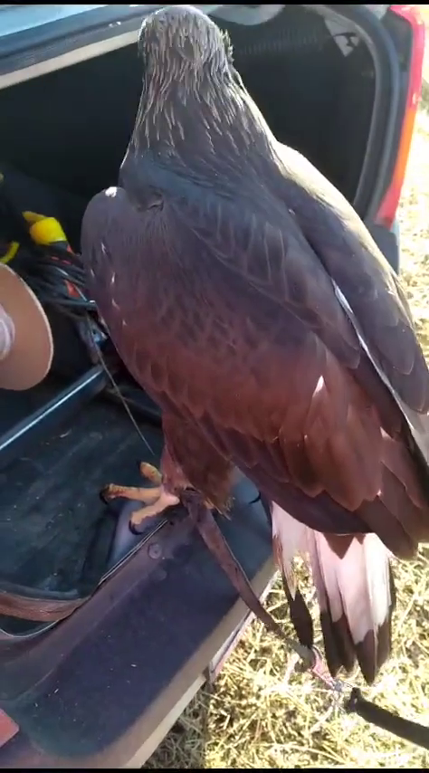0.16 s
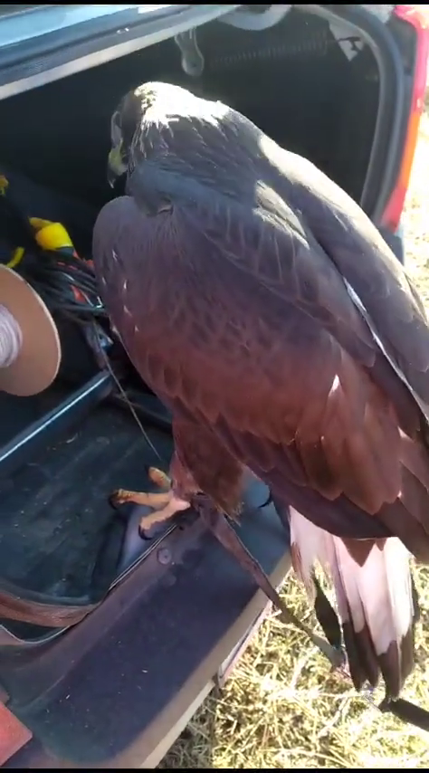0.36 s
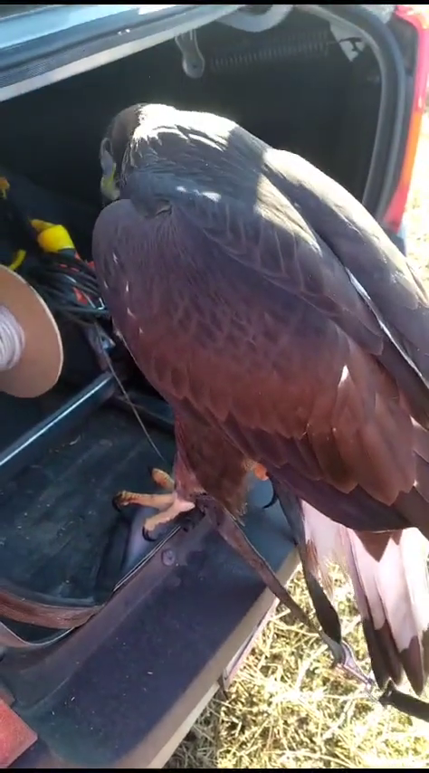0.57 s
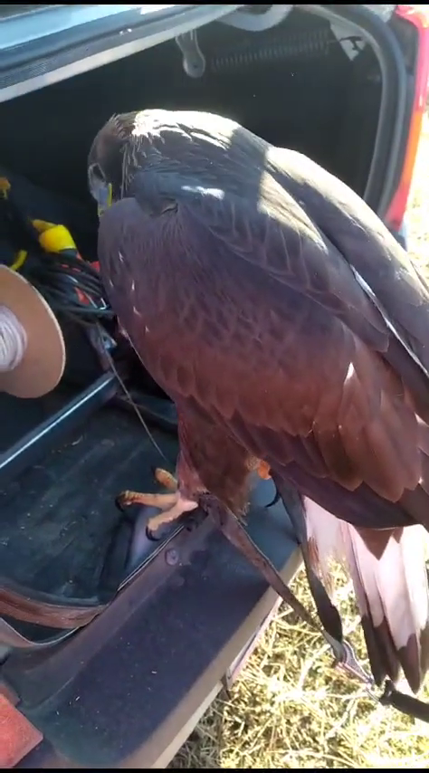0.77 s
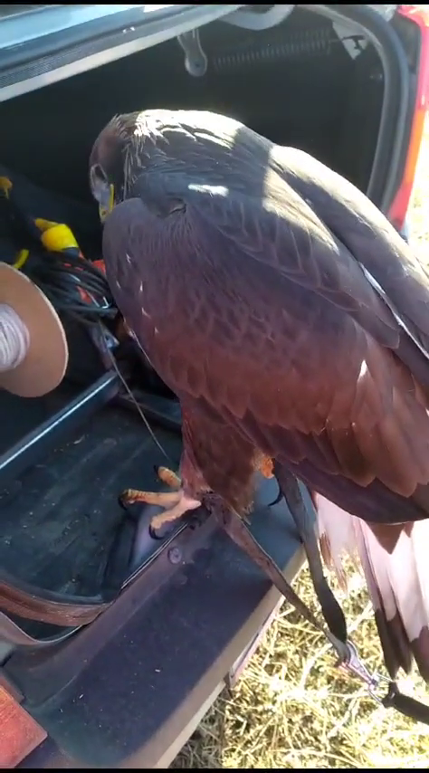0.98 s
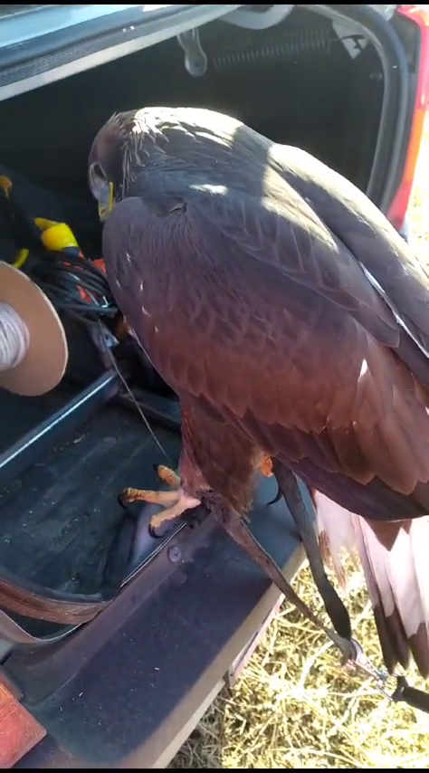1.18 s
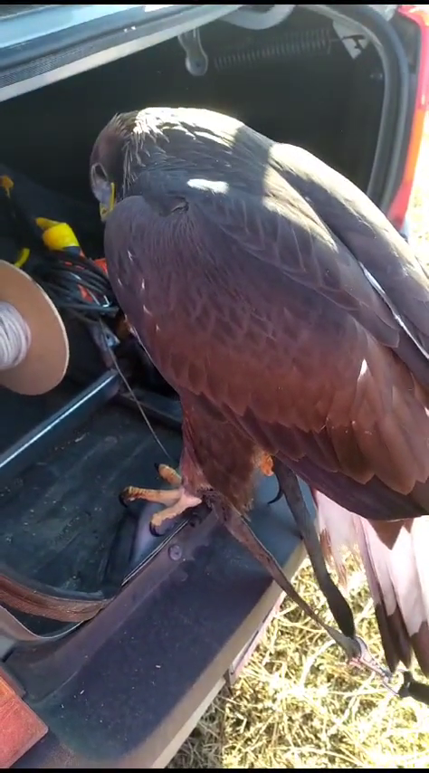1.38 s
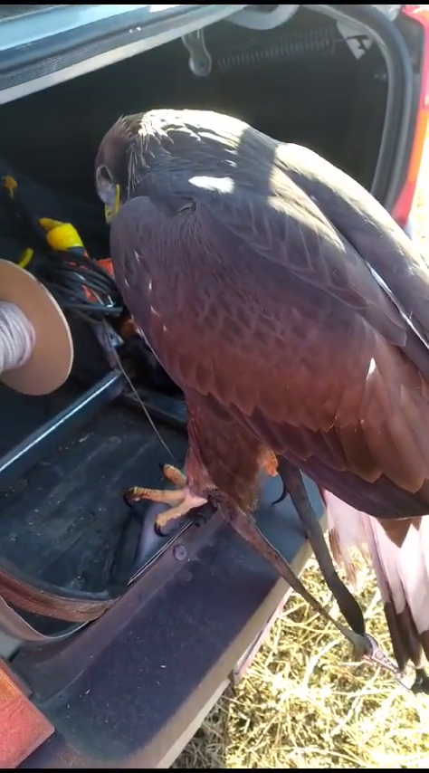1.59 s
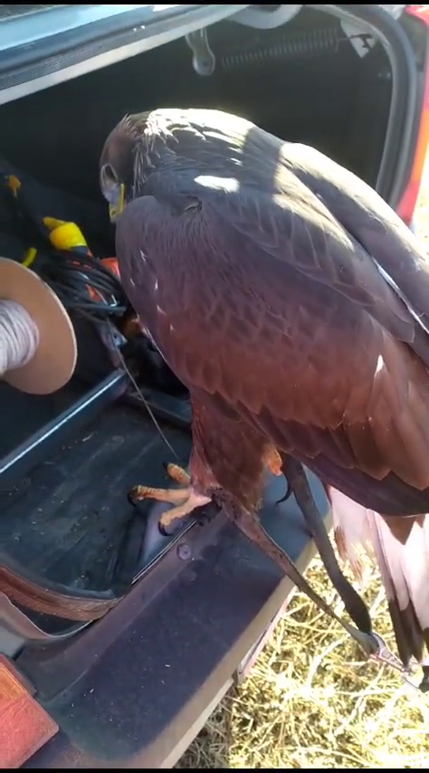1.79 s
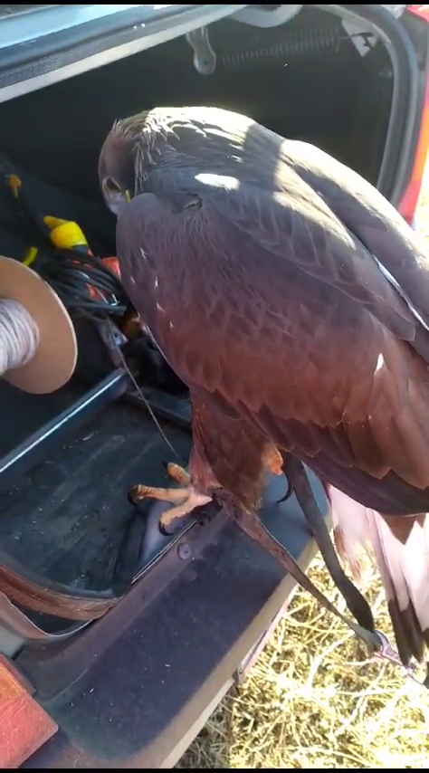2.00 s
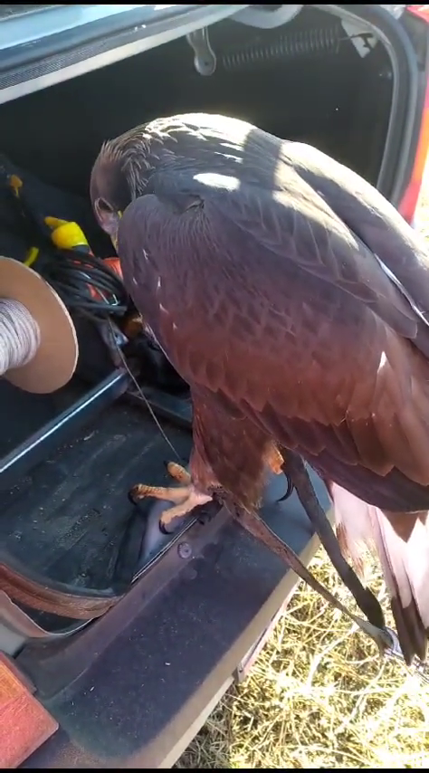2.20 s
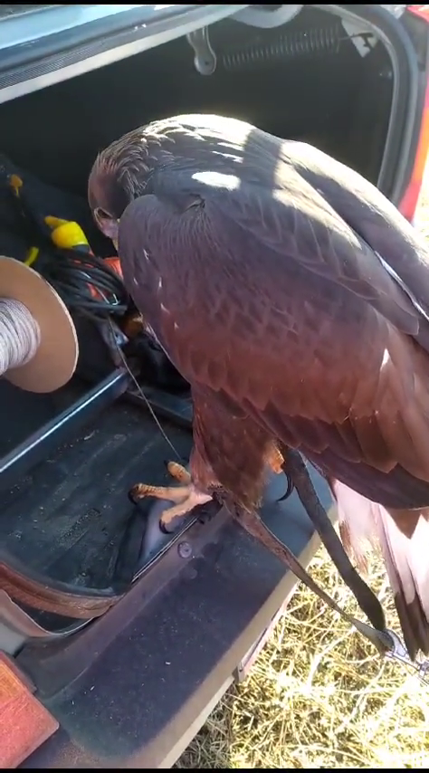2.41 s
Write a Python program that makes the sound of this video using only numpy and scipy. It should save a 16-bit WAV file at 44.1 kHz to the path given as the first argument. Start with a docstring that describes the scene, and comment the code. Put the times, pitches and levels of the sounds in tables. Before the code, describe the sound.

One eagle yelp, close in an open car boot outdoors. Feathers rustle softly from 0 to 0.3 s over faint low air noise and a barely audible drone. At 1.1 s a thin, wavering high whistle begins, swells by 1.4 s, cracks and tumbles hoarsely down until 1.62 s. Around 2 s comes a faint feather brush; low wind buffets mainly the left through 2.4 s as a distant rush grows.

```python
"""In an open car boot, a perched golden eagle gives one thin yelp, close by.
Two voices in its syrinx (the bird's voice box) whistle against each other as gliding sine waves.
Then the voice cracks and tumbles down in hoarse steps, made of unsteady overtones and pulsed hiss.
Feathers rustle as grainy hiss over faint outdoor noise and a wavering drone. At the end a distant
rush grows, and a gust, made of low noise, buffets mostly the left microphone port."""
import sys
import numpy as np
from scipy import signal
from scipy.fft import rfft, irfft
from scipy.io import wavfile
from scipy.ndimage import uniform_filter1d

SR = 44100
rng = np.random.default_rng(int(sys.argv[2]) if len(sys.argv) > 2 else 0)


def put_to_file(sound):
    """Save the sound as 16-bit audio at rate SR, in the file named by the first command-line argument."""
    columns = np.atleast_2d(sound).T  # one column per channel
    safe = np.clip(columns, -1, 1)
    whole_steps = np.round(safe * 32767)
    wavfile.write(sys.argv[1], SR, whole_steps.astype(np.int16))


N = 107868
TIME, FREQS = np.arange(N) / SR, np.fft.rfftfreq(N, 1 / SR)

# Outdoor background: its tone colour (frequency [Hz], relative level [dB per Hz])
AIR_COLOUR = [(15, -45), (25, -17), (36, 0), (55, 0.5), (85, 1), (125, -10), (250, -10), (450, -11.5),
              (700, -10), (1050, -8), (1500, -17.5), (2000, -27), (2800, -36.5), (5000, -38.5), (9000, -36),
              (15000, -44.5)]
# How alike the background is at left and right (frequency [Hz], likeness [0 to 1])
AIR_LIKENESS = [(50, 1), (300, 0.86), (700, 0.31), (1200, 0.073), (6000, 0.065)]
# Tilt of the background at the left port (frequency [Hz], gain [dB])
AIR_LEFT_TILT = [(100, 0.5), (2000, 0), (9000, -0.5)]
AIR_DB, AIR_PATCH_DB = -51.5, 2
# Distant wavering drone (frequency [Hz], level [dB])
DRONE = [(172, -63), (343, -68), (1672, -74.5)]
DRONE_WIDTH_HZ = 14

# Distant rush (time [s], level [dB]) and its tone colour (frequency [Hz], relative level [dB per Hz])
RUSH_LEVEL = [(1.9, -105), (2.1, -62), (2.25, -56), (2.44, -53)]
RUSH_COLOUR = [(400, -20), (900, 0), (1400, -1.5), (1800, -14), (2600, -39), (5000, -82)]

# Wind pressure (time [s], left level [dB], left minus right [dB])
GUST = [(0, -42.5, -4), (.03, -55.5, -4.5), (.1, -80, -22), (1.8, -67, 35), (1.91, -45, 0),
        (1.965, -39.5, 29), (2.0, -28, 23), (2.03, -30.5, 27), (2.055, -40.5, 11), (2.09, -28.5, 32),
        (2.15, -46, 9), (2.19, -34.5, 6), (2.215, -43.5, 3), (2.26, -20, 30.5), (2.285, -41.5, 35),
        (2.308, -26, 36), (2.36, -21.5, 31), (2.395, -33, 17), (2.445, -39.5, 13)]
# Sharp puffs within the gust (time [s], peak level at the left [dB])
PUFFS = [(1.987, -36), (2.026, -30.5), (2.076, -35.5), (2.256, -32), (2.349, -28.5)]
PUFF_WIDTH_S = 0.0075
# Low pressure swings and smaller eddies of the wind (frequency [Hz], relative level [dB per Hz])
BUFFET_COLOUR = [(20, -8), (45, -0.5), (75, 4.5), (125, 5), (180, -8), (300, -29), (600, -24), (2000, -90)]
EDDY_COLOUR = [(60, -11), (150, 2), (250, 5), (380, -8), (550, -21), (1200, -33), (3000, -78)]
# Eddies have EDDY_DB when the gust is at FULL_GUST_DB; growth is in dB per dB of gust
EDDY_DB, EDDY_GROWTH, FULL_GUST_DB = -32.5, 1.0, -21.5

# Feather rustle, then a softer stroke (time [s], level [dB])
RUSTLE_LEVEL = [(0, -48.5), (.007, -46.5), (.045, -45.5), (.064, -48), (.085, -55), (.127, -55.5),
                (.148, -64.5), (.2, -66), (.29, -65.5), (.305, -60), (.32, -68.5), (.385, -68), (.55, -100)]
BRUSH_LEVEL = [(1.85, -100), (1.96, -75), (2.055, -58), (2.11, -69), (2.17, -70.5), (2.26, -95)]
# Tone colours of the rustle and the softer stroke (frequency [Hz], relative level [dB per Hz])
RUSTLE_COLOUR = [(30, -11), (400, 4), (750, 3.5), (1100, -22), (2000, -9), (4500, -7.5), (6500, -8),
                 (9000, -0.5), (12000, -7.5), (15500, -9)]
BRUSH_COLOUR = [(2500, -15.5), (4500, -15), (6800, -3.5), (9500, -6.5), (12500, -15), (15000, -43)]
FEATHER_GRAIN_DB, FEATHER_LEFT_DB = 2.5, -6

# The two voices of the syrinx, before the beak (time [s], pitch [Hz], level [dB])
LOW_VOICE = [(1.098, 2620, -58), (1.113, 2625, -52.5), (1.128, 2680, -46), (1.153, 2835, -53.5),
             (1.172, 2930, -53), (1.19, 2980, -60.5), (1.21, 3000, -48), (1.25, 2970, -58),
             (1.28, 2890, -57), (1.297, 2825, -49), (1.34, 2755, -50), (1.366, 2815, -46.5),
             (1.386, 2925, -54), (1.399, 3020, -54), (1.411, 3215, -38.5), (1.425, 3225, -39.5),
             (1.436, 3120, -41), (1.442, 3080, -41), (1.455, 3170, -45)]
HIGH_VOICE = [(1.195, 3460, -75), (1.214, 3430, -59), (1.228, 3415, -53), (1.262, 3390, -53.5),
              (1.286, 3370, -63), (1.305, 3370, -82), (1.37, 3460, -84), (1.38, 3440, -57),
              (1.393, 3395, -50), (1.405, 3480, -43.5), (1.414, 3580, -48), (1.422, 3570, -47),
              (1.43, 3480, -38), (1.436, 3410, -47), (1.442, 3340, -66)]
# Overtones of one voice, weakened by the other (low multiple, high multiple, level [dB])
OVERTONES = [(2, 0, -21.5), (0, 2, -13), (3, 0, -19.5), (4, 0, -19)]
# Sum and difference tones where both voices sound (low multiple, high multiple, level [dB])
COMBINATIONS = [(1, 1, -6.5), (2, 1, -13), (1, 2, -13), (2, -1, -14), (-1, 2, -33), (-1, 3, -14.5)]
# Moments when boot reflections briefly cancel the lower voice as its pitch glides (time [s])
CANCELLATIONS = [1.1455, 1.162, 1.323, 1.354, 1.378]
CANCELLATION_WIDTH_S, EDGE_S = .005, .005
WHISTLE_JITTER, WHISTLE_SHIMMER_DB = .002, 1  # jitter is a share of the pitch
STRAIN_JITTER, STRAIN_FLUTTER_DB, FULL_VOICE_DB = 0.016, 2, -41  # unsteadiness near full strength
WHISTLE_WAVER_DB, WHISTLE_WAVER_HZ = 4, 30
# How the beak colours the whistle (frequency [Hz], gain [dB])
BEAK = [(3700, -0.5), (4500, -16), (5300, -8), (5700, 10), (6000, 2), (7300, -5), (8300, -10), (9300, 5),
        (10000, -8), (11000, -15), (11800, 1), (12700, -16)]

# Steps of the cracked voice, before the throat (start [s], length [s], first pitch [Hz], last pitch [Hz],
# pitch arch [share of pitch], level [dB], overtone slope [dB per octave], rasp [dB], undertone [dB],
# cycles per undertone period, fade [dB])
STEPS = [(1.439, .012, 2750, 2400, 0, -46, -14, -17, -20, 2, 0),
         (1.443, .02, 950, 1390, .05, -42.5, -5, -19, -13, 2, -2),
         (1.459, .013, 1840, 1890, 0, -39, -8.5, -20, -24, 3, -2),
         (1.467, .022, 1080, 1370, -.09, -42, -6, -16, -13, 2, 0),
         (1.484, .026, 1870, 1970, .02, -38, -6, -14, -17, 3, 0),
         (1.504, .029, 1960, 1730, .01, -33.5, -13, -20, -27, 2, -4),
         (1.528, .049, 1255, 965, .005, -37.5, -7.5, -19, -18, 2, -7),
         (1.577, .043, 690, 520, -.04, -40.5, -6.5, -21, -24, 2, -10)]
# How the throat colours each step (frequency [Hz], gain [dB])
THROAT = [(500, 2.5), (900, 7), (1300, 2.5), (1900, 4), (2450, 8.5), (2900, -3), (3200, -2.5), (3800, 1),
          (4600, -13), (5800, -4), (7200, -7), (8200, -32), (10000, -27), (11200, -42)]
# Tone colour of the rasp (frequency [Hz], relative level [dB per Hz])
RASP_COLOUR = [(300, -29), (700, 4), (1300, 4), (2500, 0), (3700, 2), (4700, -5), (6200, 3), (8200, -4),
               (10000, 0), (11200, -36)]
STEP_ATTACK_S, STEP_RELEASE_S, STEP_SWELL_DB = 0.0071, 0.0057, 2
STEP_JITTER, STEP_WOBBLE, STEP_SHIMMER_DB = 0.0058, .009, 1  # first two are shares of the pitch
STEP_WAVER_DB, STEP_WAVER_HZ = 4, 110
STEP_DULLING_DB = -3  # for each half of a step: overtones and rasp fade as it runs out
WHISTLE_DB, CRACK_DB = -0.9, -1.66

# How the call is coloured at the left port (frequency [Hz], gain [dB])
LEFT_SHADE = [(500, -8), (1200, 3), (1900, 3.5), (2500, -5), (2820, -10.5), (2920, 4.5), (3010, -30),
              (3200, 1), (3400, 0), (4400, -13), (8000, -15.5)]
LEFT_DELAY_S = 0.00027  # the call reaches the right port first
BOOT_DB, BOOT_T60_S = -14, .06
# Low cut of the microphone (frequency [Hz], gain [dB])
LOW_CUT = [(18, -46), (28, -28), (36, -8), (46, -0.5)]
CUTOFF_HZ = 15650


def amp(db):
    """Turns decibels into a gain."""
    return 10 ** (np.asarray(db) / 20)


def unit(x):
    """Scales a signal to an rms (average strength) of 1."""
    return x / np.sqrt(np.mean(x ** 2) + 1e-20)


def read(points, hz):
    """Reads a frequency table, with pitch spaced by ratio as the ear hears it."""
    f, value = np.transpose(points)
    return np.interp(np.log(np.maximum(hz, 1)), np.log(f), value)


def curves(table):
    """Joins the points of each column of a time table with straight lines, sample by sample."""
    s, *columns = np.transpose(table)
    return [np.interp(TIME, s, column) for column in columns]


def colour(x, spectrum):
    """Makes each frequency louder or softer by a table in dB."""
    return irfft(rfft(x) * amp(read(spectrum, FREQS)), N)


def noise(spectrum):
    """Coloured noise of rms 1."""
    return unit(colour(rng.standard_normal(N), spectrum))


def drift(rate_hz):
    """Smooth random motion of rms 1."""
    smoothing = 1 + (FREQS / rate_hz) ** 4
    return unit(irfft(rfft(rng.standard_normal(N)) / smoothing, N))


def waver(depth_db, rate_hz):
    """Random gain of rms 1 that makes one overtone come and go."""
    knots = np.arange(0, N / SR, .5 / rate_hz)
    gains = amp(depth_db * rng.standard_normal(len(knots)))
    return unit(np.interp(TIME, knots, gains))


def gate(start, end, attack, release):
    """Smooth rise, hold and fall."""
    ramp = np.minimum((TIME - start) / attack, (end - TIME) / release)
    return np.sin(np.pi / 2 * np.clip(ramp, 0, 1))


def drone():
    """Each faint tone wavers because its cosine and sine parts drift separately."""
    total = 0
    for f, db in DRONE:
        turn = 2 * np.pi * f * TIME
        tone = drift(DRONE_WIDTH_HZ) * np.cos(turn) + drift(DRONE_WIDTH_HZ) * np.sin(turn)
        total = total + amp(db) * tone
    return total


def outdoors():
    """Low, gently patchy noise, more alike at both ports in the bass, with a faint drone."""
    hz, _, z = signal.stft(rng.standard_normal((2, N)), SR, nperseg=1024, noverlap=768)
    same = np.clip(read(AIR_LIKENESS, hz), -1, 1)[:, None]
    patches = uniform_filter1d(rng.standard_normal(z[0].shape), size=12, axis=0)  # over frequency
    patches = unit(uniform_filter1d(patches, size=16, axis=1))  # over time
    pair = np.array([z[0], same * z[0] + np.sqrt(1 - same ** 2) * z[1]])
    pair = pair * amp(AIR_PATCH_DB * patches)
    air = signal.istft(pair, nperseg=1024, noverlap=768)[1][:, :N]
    left, right = colour(air, AIR_COLOUR)
    return amp(AIR_DB) * unit(np.array([colour(left, AIR_LEFT_TILT), right])) + drone()


def rush():
    """A distant midrange rush grows at the end, with noise partly shared by both ports."""
    shared = noise(RUSH_COLOUR)
    pair = np.array([shared + 1.45 * noise(RUSH_COLOUR) for _ in range(2)])
    return amp(curves(RUSH_LEVEL)[0]) * unit(pair)


def buffeting(db):
    """Wind at one port: low pressure swings, and smaller eddies that grow along with the gust."""
    swing = signal.hilbert(noise(BUFFET_COLOUR))
    strength = np.sqrt(uniform_filter1d(abs(swing) ** 2, size=700))
    even_swing = swing.real / strength  # evens out the noise's own slow rises and falls
    even_swing = unit(colour(even_swing, [(300, -3), (900, -34)]))
    eddy_db = EDDY_DB + EDDY_GROWTH * (db - FULL_GUST_DB)
    return amp(db) * even_swing + amp(eddy_db) * noise(EDDY_COLOUR)


def wind():
    """The gust and its sharp puffs push on each port with separate noise."""
    db, lean_db = curves(GUST)
    puffs = sum(amp(peak_db) * np.exp(-((TIME - s) / PUFF_WIDTH_S) ** 2) for s, peak_db in PUFFS)
    ports = []
    for shelter_db in (0, lean_db):  # left, right
        puff_noise = amp(-shelter_db) * puffs * noise(EDDY_COLOUR)
        ports.append(buffeting(db - shelter_db) + puff_noise)
    return np.array(ports)


def feathers(stroke, band):
    """Feathers sliding over each other make a fine grainy hiss, softer at the left."""
    grain = unit(amp(FEATHER_GRAIN_DB * drift(rate_hz=3000)))
    hiss = np.array([amp(FEATHER_LEFT_DB) * noise(band), noise(band)])
    return amp(curves(stroke)[0]) * grain * hiss


def voice(table):
    """Phase and strength of one side of the syrinx, less steady as it nears full strength."""
    hz, db = curves(table)
    effort = amp(db - FULL_VOICE_DB)
    jitter = WHISTLE_JITTER + STRAIN_JITTER * effort
    phase = 2 * np.pi * np.cumsum(hz * (1 + jitter * drift(rate_hz=500))) / SR
    flutter_db = STRAIN_FLUTTER_DB * np.minimum(effort, 1) * drift(rate_hz=220)
    shimmer_db = WHISTLE_SHIMMER_DB * drift(rate_hz=66)
    edges = gate(table[0][0], table[-1][0], EDGE_S, EDGE_S)
    return phase, amp(db + flutter_db + shimmer_db) * edges


def whistle():
    """Two coupled voices with their overtones and their sum and difference tones."""
    (low, a), (high, b) = voice(LOW_VOICE), voice(HIGH_VOICE)
    notches = [np.tanh(abs(TIME - s) / CANCELLATION_WIDTH_S) for s in CANCELLATIONS]
    out = np.prod(notches, axis=0) * a * np.sin(low) + b * np.sin(high)
    for m, n, db in OVERTONES:
        strength = (a if m else b) ** 3 / (a ** 2 + b ** 2 + 1e-18)
        gain = amp(db) * waver(WHISTLE_WAVER_DB, WHISTLE_WAVER_HZ)
        out += gain * strength * np.sin(round(m) * low + round(n) * high)
    both = 2 * a * b / (a + b + 1e-12)  # strong only where both voices sound
    for m, n, db in COMBINATIONS:
        out += amp(db) * both * np.sin(round(m) * low + round(n) * high)
    return np.sqrt(2) * out


def step(start, length, first_hz, last_hz, arch, db, slope_db, rasp_db, undertone_db, cycles, fade_db):
    """One step of the cracked voice: jittery overtones, cycles in twos or threes and a pulsed rasp."""
    u = np.clip((TIME - start) / length, 0, 1)  # progress through the step
    hump, dulling = np.sin(np.pi * u), amp(STEP_DULLING_DB * (2 * u - 1.5))
    hz = (first_hz + (last_hz - first_hz) * u) * (1 + arch * hump)
    unsteady = 1 + STEP_JITTER * drift(rate_hz=580) + STEP_WOBBLE * drift(rate_hz=122)
    phase = 2 * np.pi * np.cumsum(hz * unsteady) / SR
    overtones = 0
    for k in range(2, int(CUTOFF_HZ / max(first_hz, last_hz))):
        gain = amp(slope_db * np.log2(k) + read(THROAT, k * hz))
        overtones = overtones + gain * waver(STEP_WAVER_DB, STEP_WAVER_HZ) * np.sin(k * phase)
    tone = amp(read(THROAT, hz)) * np.sin(phase) + dulling * overtones
    # A slower beat groups the cycles and gives the undertone
    tone *= 1 + 2 * amp(undertone_db) * np.cos(phase / round(cycles) + drift(rate_hz=75))
    rasp = amp(rasp_db) * dulling * noise(RASP_COLOUR) * (1 + np.cos(phase))
    shimmer_db = STEP_SHIMMER_DB * drift(rate_hz=380)
    level = db + fade_db * u ** 2 + STEP_SWELL_DB * (hump - 1) + shimmer_db
    edges = gate(start, start + length, STEP_ATTACK_S, STEP_RELEASE_S)
    return amp(level) * edges * (tone + rasp)


def boot(call):
    """The call reaches both ports, with short reflections of the car boot as fading noise echoes."""
    left = irfft(rfft(call) * np.exp(-2j * np.pi * FREQS * LEFT_DELAY_S), N)
    t = TIME[:SR // 4]
    fading = amp(-60 * t / BOOT_T60_S) * (t > .002)  # echoes start after 2 ms
    tails = rng.standard_normal((2, len(t))) * fading
    echoes = signal.fftconvolve(call[None], tails / np.linalg.norm(tails[0]), axes=1)[:, :N]
    left, right = np.array([left, call]) + amp(BOOT_DB) * echoes
    return np.array([colour(left, LEFT_SHADE), right])


def eagle():
    """The whistle rings through the beak, and the cracked steps follow."""
    cracked = sum(step(*row) for row in STEPS)
    return amp(WHISTLE_DB) * colour(whistle(), BEAK) + amp(CRACK_DB) * cracked


def scene():
    """Adds up background, wind, feathers and the eagle in the car boot."""
    background = outdoors() + rush() + wind()
    plumage = feathers(RUSTLE_LEVEL, RUSTLE_COLOUR) + feathers(BRUSH_LEVEL, BRUSH_COLOUR)
    return background + plumage + boot(eagle())


def record(dry):
    """The microphone cuts the lowest bass and the recorder cuts the highest treble."""
    band_limit = signal.firwin(511, CUTOFF_HZ, window=("kaiser", 9), fs=SR)
    return signal.oaconvolve(colour(dry, LOW_CUT), band_limit[None], "same")


dry = scene()
out = record(dry)
put_to_file(out)
```